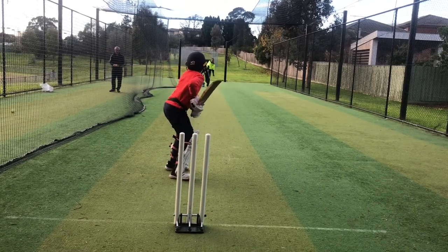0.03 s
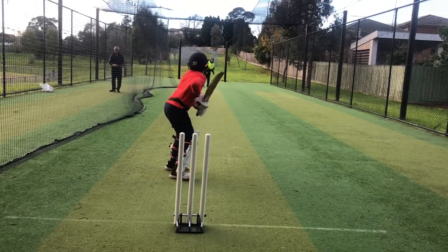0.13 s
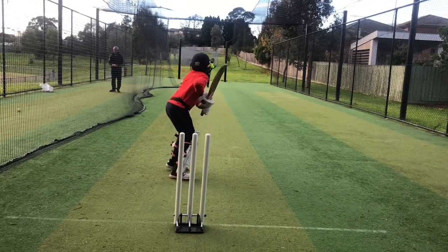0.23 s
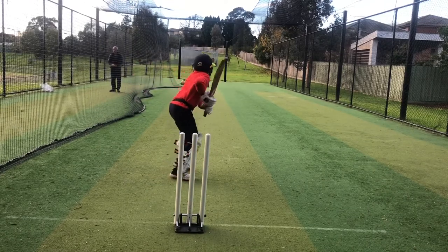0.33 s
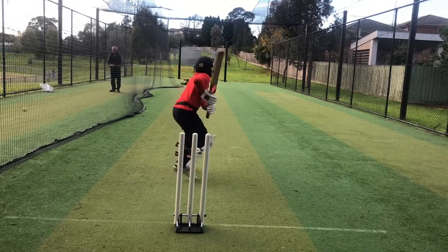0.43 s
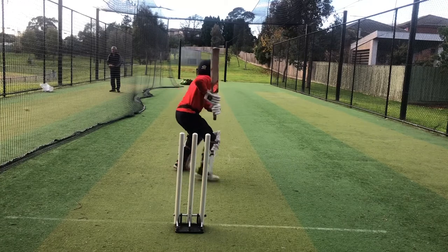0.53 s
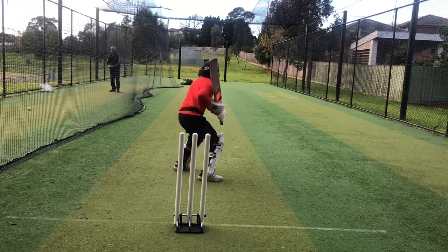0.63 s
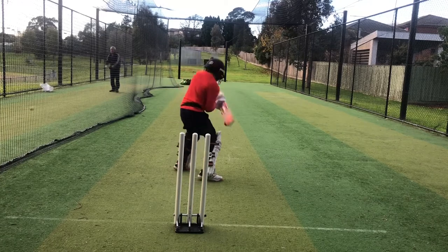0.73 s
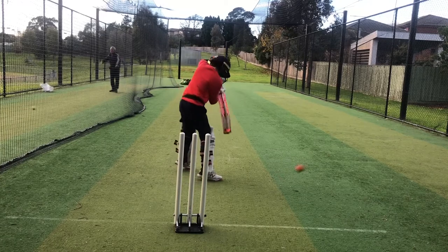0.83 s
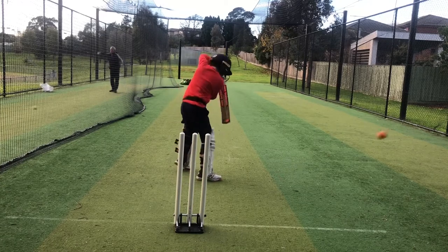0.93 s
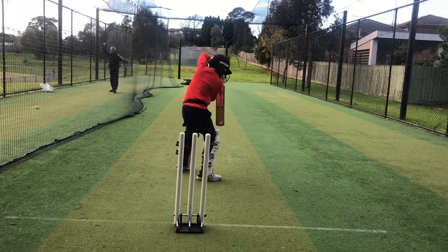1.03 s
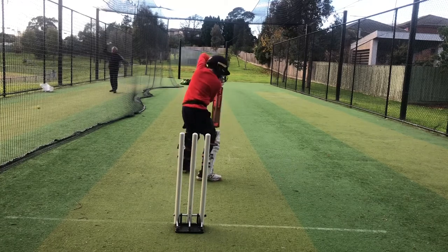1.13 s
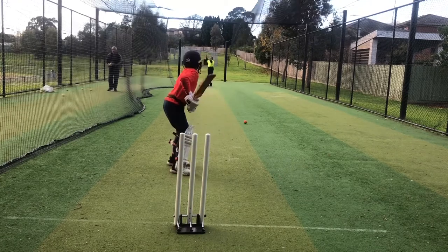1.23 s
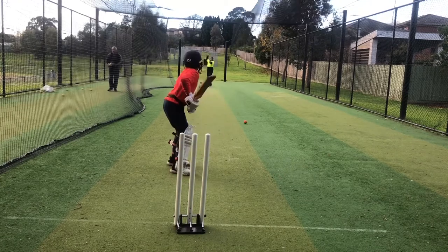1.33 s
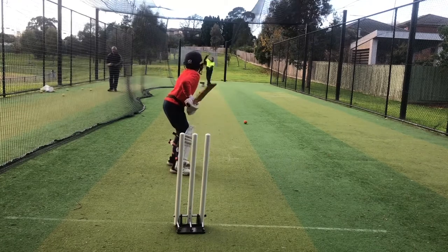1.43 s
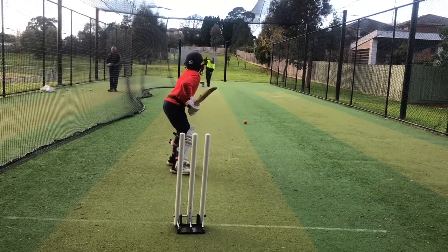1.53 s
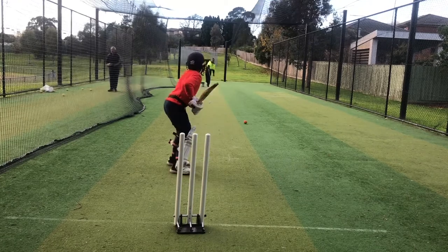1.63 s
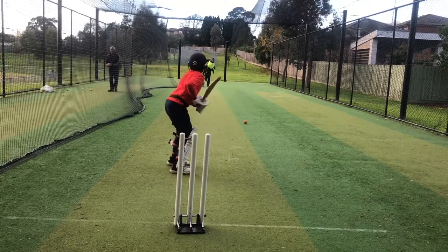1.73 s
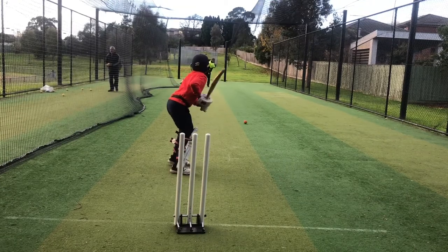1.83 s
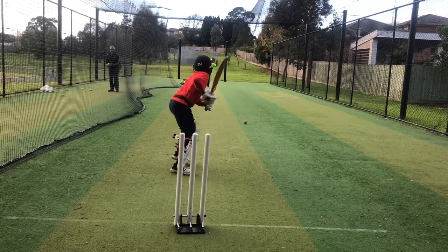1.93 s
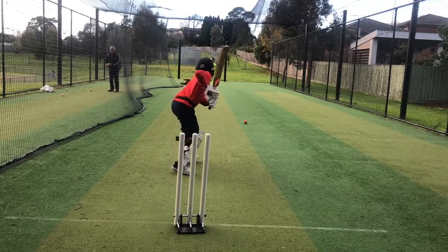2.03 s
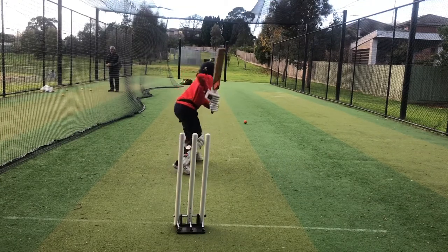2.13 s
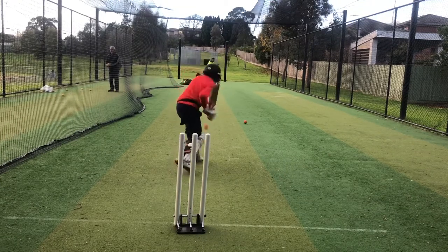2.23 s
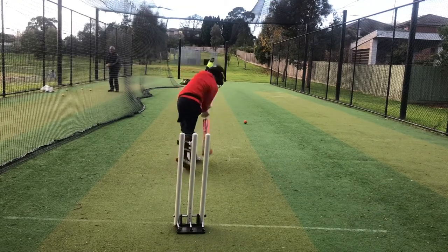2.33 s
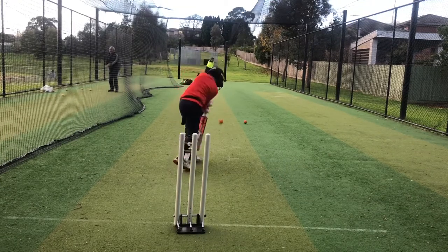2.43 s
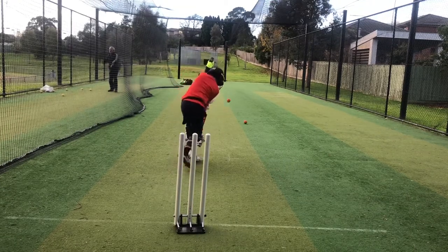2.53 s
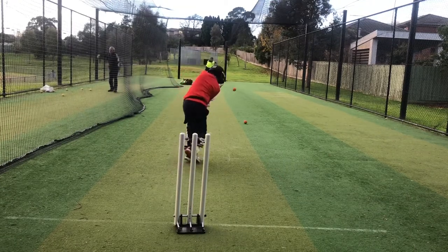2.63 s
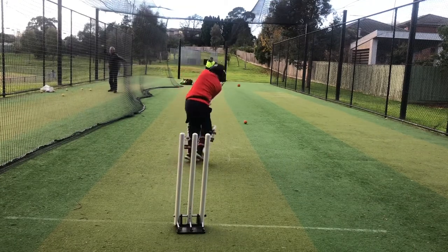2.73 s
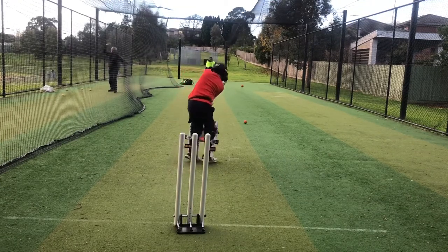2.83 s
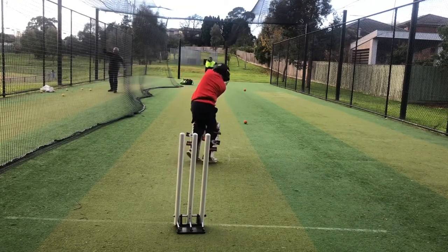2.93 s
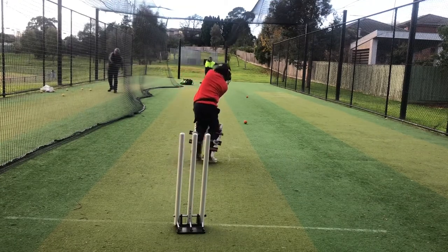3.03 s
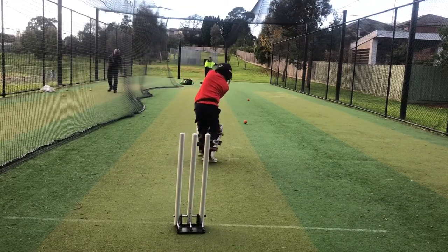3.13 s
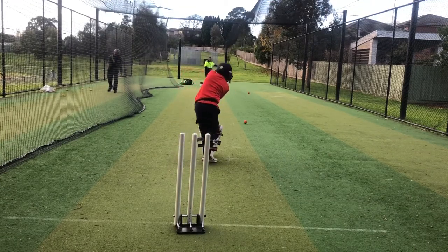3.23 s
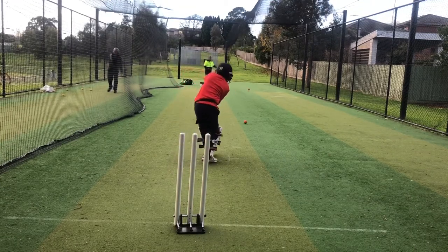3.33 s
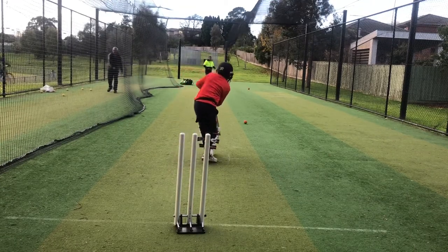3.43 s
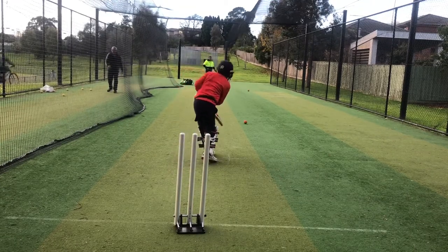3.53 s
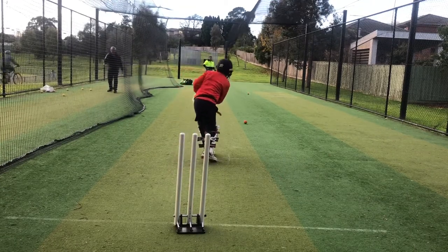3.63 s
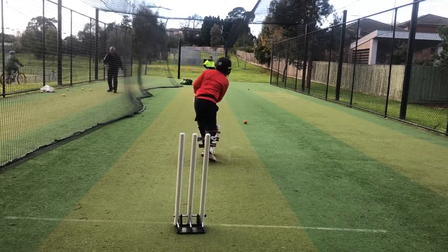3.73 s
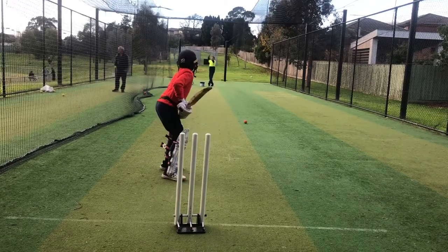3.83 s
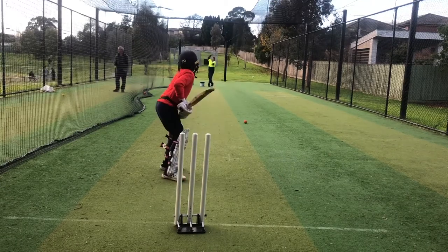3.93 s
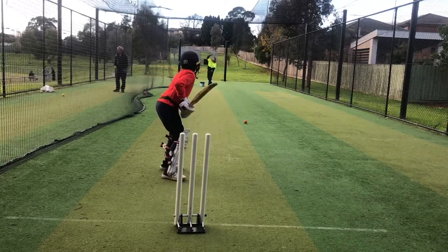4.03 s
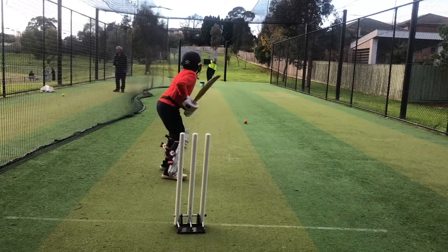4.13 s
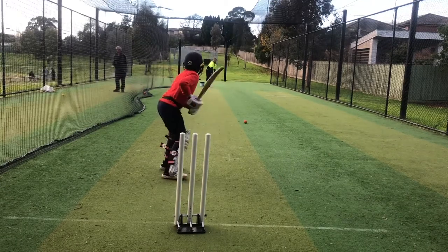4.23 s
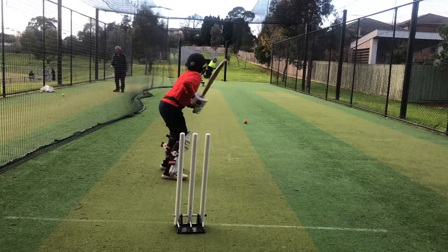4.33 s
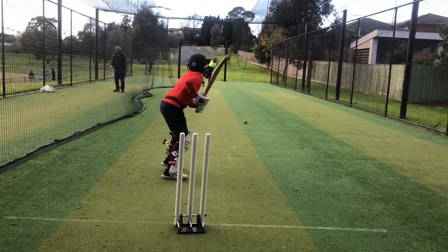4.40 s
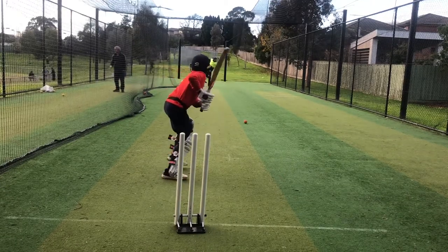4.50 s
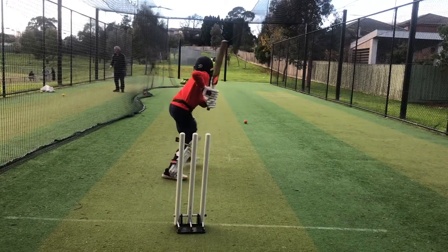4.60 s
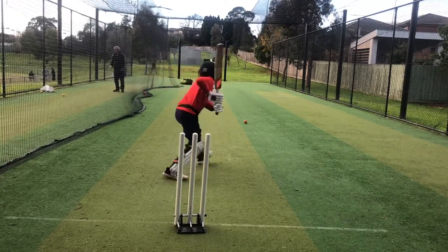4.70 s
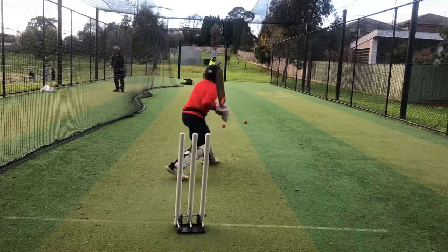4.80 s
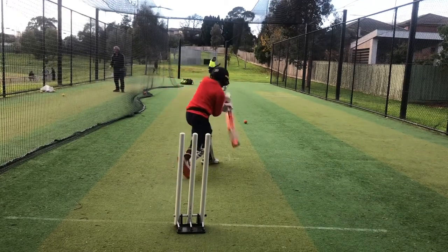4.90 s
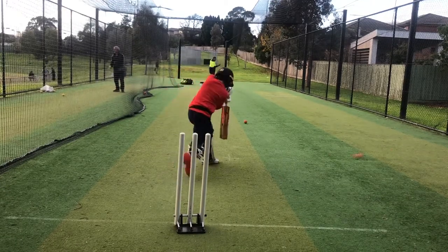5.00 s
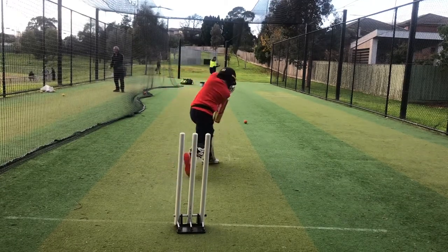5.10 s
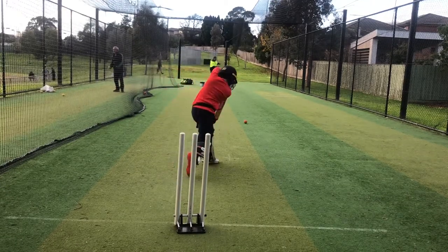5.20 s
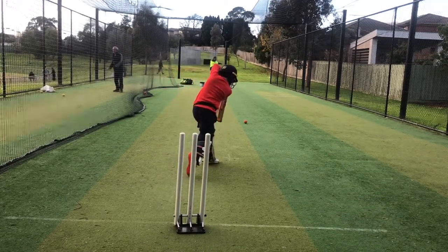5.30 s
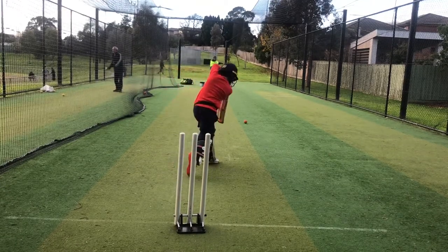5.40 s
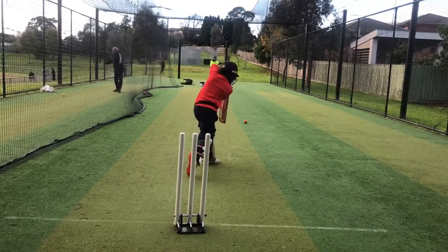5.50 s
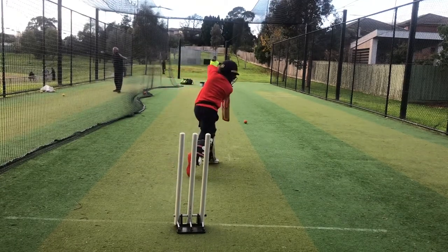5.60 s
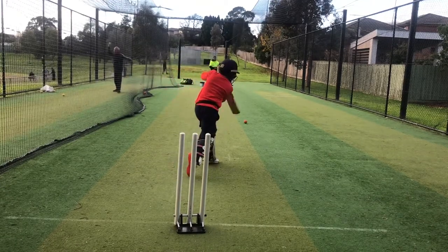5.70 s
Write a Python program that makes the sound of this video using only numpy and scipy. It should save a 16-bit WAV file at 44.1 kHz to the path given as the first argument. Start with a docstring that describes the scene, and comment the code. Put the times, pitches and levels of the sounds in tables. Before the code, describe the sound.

A cricket batter hits three deliveries with sharp loud cracks; the ball knocks on thin turf, shoes scuff, and one deep panel thump follows the last.

```python
"""An outdoor batting net between two fences: three deliveries joined by short fades.
The bat cracks on the ball; the ball bounces on thin turf over concrete and thumps a panel near the microphone.
Each knock is a noise crack plus ringing modes, returned by the fences and a scattered tail.
Shaped noise makes shoes and pads scuff and swish, wind buffet the microphone and far traffic hum;
a soft push on ringing ground modes makes the front foot plant."""
import sys
import numpy as np
from scipy import signal
from scipy.fft import rfft, irfft, next_fast_len
from scipy.io import wavfile

SR = 44100
rng = np.random.default_rng(int(sys.argv[2]) if len(sys.argv) > 2 else 0)


def wav_record(signal):
    """Record a signal, one row per channel, as 16-bit PCM in the file named by sys.argv[1]."""
    frames = np.transpose(np.atleast_2d(signal))
    bounded = np.clip(frames, -1, 1)
    # unit amplitude maps onto the largest positive 16-bit level
    quanta = np.round(bounded * 32767).astype(np.int16)
    wavfile.write(sys.argv[1], SR, quanta)


N = 253876
TIME = np.arange(N) / SR

# Joins between deliveries: at_s, fade_out_s, fade_in_s
JOINS = [(1.25, 0.053, 0.048), (3.784, 0.041, .03)]


def from_db(db):
    """Decibels to gain."""
    return 10 ** (np.asarray(db) / 20)


def rms_one(x):
    """Scale to rms 1."""
    return x / np.sqrt(np.mean(x ** 2) + 1e-20)


def at_hz(hz, points, column=1):
    """Read a table column on a log-frequency axis."""
    points = np.array(points)
    return np.interp(np.log(hz + 1), np.log(points[:, 0]), points[:, column])


def coloured(spectrum):
    """Steady noise of the given spectrum, rms 1."""
    size = next_fast_len(N)
    hz = np.arange(size // 2 + 1) * SR / size
    white = rfft(rng.standard_normal(size))
    return rms_one(irfft(white * from_db(at_hz(hz, spectrum)), size)[:N])


def drift(rate_hz):
    """Slow random wander of rms 1: white noise through two equal one-pole lowpasses."""
    r = np.exp(-2 * np.pi * rate_hz / SR)
    wander = signal.lfilter([1], [1, -2 * r, r * r], rng.standard_normal(N + SR))
    return rms_one(wander[SR:])     # the first second lets the filter settle


def band_noise(noise, edges_hz):
    """Keep one band of a noise."""
    return signal.sosfilt(signal.butter(2, edges_hz, "band", fs=SR, output="sos"), noise)


def ring(force, hz, t60_s):
    """One decaying mode: a two-pole resonator driven by a force."""
    r, w = from_db(-60 / (t60_s * SR)), 2 * np.pi * hz / SR
    return signal.lfilter([0, np.sin(w)], [1, -2 * r * np.cos(w), r * r], force + 1e-18)


def add(out, at_s, sound):
    """Mix a sound in at a time."""
    i = int(round(at_s * SR))
    part = sound[:max(len(out) - i, 0)]
    out[i:i + len(part)] += part


def air():
    """Far traffic, wavering a little, and a faint patchy rustle of leaves and netting."""
    # Traffic spectrum, scaled to rms 1: freq_hz, relative_db_per_hz
    traffic_spectrum = [(15, -64), (25, -19), (70, -2.5), (108, -6), (146, -9), (226, -15), (457, -20),
                        (584, -20.5), (1150, -22), (2400, -32), (3910, -33), (15200, -52.5), (16500, -61)]
    traffic_db = -51.5 + 1.1 * drift(0.69)
    traffic = from_db(traffic_db) * coloured(traffic_spectrum)
    treble = signal.butter(2, 3500, "high", fs=SR, output="sos")
    rustle = signal.sosfilt(treble, rng.standard_normal(N))
    return traffic + from_db(-79.5 + 4.0 * drift(7)) * rustle


def scuffs():
    """Gritty friction noise in a broad band, swelling and fading; a tick is a very short wide one."""
    # Shoes and pads drag over the turf: start_s, length_s, level_db, centre_hz
    drags = [(0.008, .11, -53, 5100), (0.308, .09, -57, 4650), (0.369, .026, -44, 4167),
             (0.393, .079, -57.5, 4700), (0.538, .072, -47.5, 5560), (0.606, .041, -56, 5570),
             (1.09, .045, -57.5, 8000), (1.619, .11, -56.5, 3300), (1.98, .09, -63, 9000),
             (2.108, .075, -57.5, 5560), (2.245, .057, -45, 4800), (2.294, .04, -40.5, 4660),
             (2.807, .05, -47.5, 5100), (2.976, .054, -50.5, 3500), (3.239, .062, -51, 6020),
             (4.058, .068, -51.5, 5600), (4.135, .15, -57.5, 4280), (4.712, .046, -47, 7350),
             (4.882, .07, -37.5, 6500)]
    # Small ticks of studs and buckles: start_s, level_db
    stud_ticks = [(0.587, -36.5), (2.264, -38), (2.838, -36), (3.008, -47.5)]
    # each row gains its rise (share of the length) and bandwidth (octaves)
    rows = [(*row, .33, 1.85) for row in drags]
    rows += [(s, .008, db, 6200, .4, 3.1) for s, db in stud_ticks]

    grit = rng.standard_normal(N) * from_db(2.4 * drift(250))
    out = np.zeros(N)
    for s, length_s, db, centre_hz, rise, octaves in rows:
        rise_s, fall_s = rise * length_s, (1 - rise) * length_s
        i = int(s * SR)
        t = np.arange(int(3 * length_s * SR)) / SR     # room for the fade to die away
        half_width = 2 ** (octaves / 2)
        edges_hz = np.clip([centre_hz / half_width, centre_hz * half_width], 100, .45 * SR)
        band = band_noise(grit[i:i + len(t)], edges_hz)
        swell = np.sin(np.pi / 2 * t / rise_s) ** 2
        fade = np.exp(-(abs(t - rise_s) / fall_s) ** 2.5)
        shape = np.where(t < rise_s, swell, fade)
        add(out, s, from_db(db) * rms_one(band) * shape[:len(band)])
    return out


def swishes():
    """Narrow noise riding on a gliding centre."""
    # Short swishes: start_s, length_s, from_hz, to_hz, level_db
    glides = [(0.035, 0.027, 3340, 4630, -50), (0.07, 0.029, 3780, 3500, -54),
              (0.38, 0.011, 2790, 4760, -42), (0.908, 0.024, 4200, 3900, -48),
              (2.459, 0.031, 5180, 3780, -44.5), (2.969, .04, 1990, 2184, -51),
              (4.078, 0.045, 3400, 4830, -49), (4.138, 0.12, 713, 2300, -55.5),
              (4.18, 0.047, 5600, 6700, -58), (4.885, 0.011, 5220, 8600, -39),
              (5.393, 0.065, 5260, 6730, -64)]
    width_hz = 800
    lowpass = signal.butter(2, width_hz / 2, fs=SR, output="sos")
    out = np.zeros(N)
    for s, length_s, from_hz, to_hz, db in glides:
        size = int(length_s * SR)
        u = np.arange(size) / size
        slow_pair = signal.sosfilt(lowpass, rng.standard_normal((2, SR // 4)))[:, -size:]
        phase = 2 * np.pi * np.cumsum(from_hz * (to_hz / from_hz) ** u) / SR
        # two lowpassed noises on cosine and sine carriers make one band around the glide
        band = slow_pair[0] * np.cos(phase) + slow_pair[1] * np.sin(phase)
        add(out, s, from_db(db) * np.sin(np.pi * u) * rms_one(band))
    return out


def smear(x, lags):
    """All-pass chain: spreads a sound in time, keeps its colour."""
    for lag in lags:
        taps = np.zeros(lag + 1)
        taps[0], taps[-1] = -.45, 1
        x = signal.lfilter(taps, taps[::-1], x)
    return x


def struck_body(ring_db, modes, contact_s, crack_s, lag_cycles, dull_db):
    """A brief contact push rings each mode, low ones later; also gives a faster-dying version."""
    t = np.arange(SR // 3) / SR
    strengths_db = rng.normal(0, 1, len(modes))
    body, blur = 0, 0
    for k, (hz, db, t60_s) in enumerate(modes):
        u = (t - crack_s - lag_cycles / hz).clip(0) / contact_s
        level = from_db(ring_db + db + strengths_db[k] - dull_db * np.log2(hz / 500))
        push = (-1) ** k * level * u * np.exp(-u) / (contact_s * SR)
        body = body + ring(push, hz, t60_s)
        blur = blur + 2 * ring(push, hz, t60_s / 4.5)
    return body, blur


def fence_arrivals(s, near_s, near_db, far_s, far_db):
    """The direct sound, then near, far and combined echoes and a flutter between the fences."""
    flutter_s, flutter_db = .0318, -6.5     # time and level change of each round trip
    arrivals = [(s, 0), (s + near_s, near_db), (s + far_s, far_db)]
    arrivals.append((s + far_s + near_s, far_db + near_db - 13.5))
    arrivals += [(s + far_s + k * flutter_s, far_db + k * flutter_db) for k in range(1, 5)]
    return arrivals


def knock(row, hiss, modes, contact_s, crack_s, lag_cycles, dull_db, scatter_db):
    """A noise crack, then ringing modes, returned smeared and duller; also a pulse to feed the yard."""
    s, crack_db, above_db, *echoes = row
    body, blur = struck_body(crack_db + above_db, modes, contact_s, crack_s, lag_cycles, dull_db)
    t = np.arange(SR // 3) / SR
    out, feed = np.zeros(N), np.zeros(N)
    for order, (at_s, db) in enumerate(fence_arrivals(s, *echoes)):
        u = t / (crack_s * (1 + .3 * order))     # each later arrival has a longer crack
        burst = u ** 2 * np.exp(1.5 - 1.765 * u ** 0.92)
        start = rng.integers(0, N - len(t))
        crack = from_db(crack_db - 1.5 * order) * burst * hiss[start:start + len(t)] / 2
        if order:     # every return loses treble, later ones more
            cut_hz = min(11000 / order, .45 * SR)
            crack = signal.lfilter(*signal.butter(1, cut_hz, fs=SR), crack)
        lags = rng.integers(25, 90, min(order, 2))     # posts and slats return copies just behind
        early_s = .3 * order * crack_s     # a smeared echo swells in ahead of its peak
        add(out, at_s - early_s, from_db(db) * crack)
        add(out, at_s, from_db(db) * smear(body, lags))
    blur[:2] += from_db(crack_db + 23.5) * np.array([1, -.6])     # a bright click joins the pulse
    add(feed, s, from_db(scatter_db) * blur)
    return out, feed


def yard(x):
    """Scattered return from trees, fences and houses: lumpy noise, swelling briefly, dying band by band."""
    # Scattered tail: freq_hz, level_db, t60_s
    tail = [(100, -23, .5), (257, 6.5, 0.7), (600, -13, .9), (1200, -2, 0.72), (2520, -16.5, 0.83),
            (5000, -9.5, .55), (8500, -14.5, 0.39), (14000, -28.5, .3)]
    t = np.arange(SR) / SR
    edges_hz = 60 * 2 ** np.arange(0, 8.4, .5)
    white = rng.standard_normal((2, SR)) * from_db(2.4 * drift(45)[:SR])
    response = 0
    for k, (low, high) in enumerate(zip(edges_hz, edges_hz[1:])):
        band = band_noise(white[k % 2], [low, high])
        hz = np.sqrt(low * high)
        t60_s = at_hz(hz, tail, column=2).clip(.05)
        response = response + band * from_db(at_hz(hz, tail) - 60 * t / t60_s)
    response = response * (1 - np.exp(-t / 0.0015)) / np.sqrt(SR / 20)
    return signal.fftconvolve(x, response)[:N]


def knocks():
    """Bat, turf and panel impacts with their returns; a join ends whatever still rings."""
    # Impacts: at_s, crack_db, ring_above_crack_db, near_echo_s, near_echo_db, far_echo_s, far_echo_db
    bat_blows = [(0.7802, -2.5, -2.5, .0203, -4, .0465, -6), (2.332, -1.5, -1.5, .0203, -3.5, .0505, -10),
                 (4.9123, -3.5, .5, .019, -2.5, .050, -7.5)]
    turf_bounces = [(0.5159, -24.5, -1, .015, -1, .045, -16), (2.2157, -36, 0, .017, -16, .047, -16),
                    (2.2723, -17, -6, .018, -6, .048, -10), (3.139, -34, -3, .016, -27, .046, -25),
                    (3.6694, -20, -2, .009, -6, .028, -19), (3.729, -15, -1.5, .020, -14, .030, -24),
                    (3.7363, -11, -1.5, .022, -17, .031, -11), (4.7614, -19, -6, .015, -5, .046, -28),
                    (5.529, -24, -30, .028, -17, .058, -34)]
    panel_thumps = [(5.2232, -9.5, 5.8, .028, -11, .059, -17)]
    # Ringing modes of each struck thing: freq_hz, level_db, t60_s
    bat_modes = [(200, -11.5, 0.036), (370, -7.5, 0.01), (527, -6, 0.013), (766, -1, 0.026),
                 (996, -9, 0.016), (1330, -7.5, 0.013), (1606, -2.5, 0.014), (2384, -13.5, 0.035),
                 (3940, -24, .015)]
    turf_modes = [(146, -11, 0.066), (259.5, -2, 0.02), (510, 2, 0.014), (875, -9, .02), (1270, -33, .02)]
    panel_modes = [(80.7, -10, 0.22), (149, -1, 0.093), (233, 1.5, 0.054), (310, 1, 0.033),
                   (463, -2, 0.026), (765, -8, 0.026), (1110, -13, 0.035)]
    # Manner of impact: contact_s and crack_s (time scales), lag_cycles, dullness_db_per_octave, scatter_db
    bat_way = (.00007, .0013, .6, .8, 2)
    turf_way = (.0002, .0015, .3, .2, -1)
    panel_way = (.0002, .0016, .4, .5, -10)
    # Shared crack spectrum before tilt: freq_hz, relative_db_per_hz
    crack_spectrum = [(880, -15.5), (1500, -16), (2260, -14.5), (4300, -15.5), (8680, -16.5),
                      (10400, -19.5), (15100, -24), (16500, -37.5)]
    # Crack brightness about 4 kHz: bat, turf, panel (each db_per_octave)
    crack_tilts = (-.1, 2, -.8)

    hisses = []
    for tilt in crack_tilts:
        hisses.append(coloured([(hz, db + tilt * np.log2(hz / 4000)) for hz, db in crack_spectrum]))
    kinds = [(bat_blows, hisses[0], bat_modes, bat_way),
             (turf_bounces, hisses[1], turf_modes, turf_way),
             (panel_thumps, hisses[2], panel_modes, panel_way)]

    out = np.zeros(N)
    bounds = [0] + [s for s, *_ in JOINS] + [N / SR]
    for start, end in zip(bounds, bounds[1:]):
        direct, feed = np.zeros(N), np.zeros(N)
        for rows, hiss, modes, way in kinds:
            for row in rows:
                if start < row[0] < end:
                    sound, pulse = knock(row, hiss, modes, *way)
                    direct += sound
                    feed += pulse
        out += (direct + yard(feed)) * (TIME < end)
    return out


def footfalls():
    """The front foot plants: a soft slow push sets the slab thudding."""
    # Foot plants: at_s, level_db
    plants = [(2.227, -14.5), (4.804, -9)]
    # Slab modes: freq_hz, level_db, t60_s
    slab_modes = [(104.6, -4, .09), (165, -13, 0.053)]
    t = np.arange(SR // 4) / SR
    push = t / .0015 * np.exp(-t / .0015)
    push = push / push.sum()
    out = np.zeros(N)
    for s, db in plants:
        for hz, mode_db, t60_s in slab_modes:
            add(out, s, from_db(db + mode_db) * ring(push, hz, t60_s))
    return out


def wind():
    """Lumpy low turbulence on the microphone; stronger gusts reach higher."""
    # Groups of gusts, each a level curve: at_s, level_db
    gust_groups = [
        [(3.79, -51), (3.866, -37), (3.894, -39), (3.924, -32), (3.968, -40), (3.998, -37), (4.046, -40),
         (4.082, -66), (4.09, -57)],
        [(4.1, -51), (4.34, -42), (4.372, -52), (4.404, -43), (4.444, -55), (4.532, -43), (4.608, -61),
         (4.706, -43), (4.73, -46), (4.8, -31)],
        [(5.34, -34), (5.372, -39), (5.454, -46), (5.486, -36), (5.522, -31), (5.55, -37), (5.598, -28),
         (5.63, -33), (5.694, -33), (5.757, -45)],
    ]
    calm_db, step_db = -51, 7.5     # one layer higher for each step over calm
    gusty = rng.standard_normal(N) * from_db(2.1 * drift(28))
    rumble_cut = signal.butter(2, 70, "high", fs=SR, output="sos")
    layers = []
    for top_hz in [132, 202, 290, 460]:
        top_cut = signal.butter(5, top_hz, fs=SR, output="sos")
        layers.append(rms_one(signal.sosfilt(np.vstack([top_cut, rumble_cut]), gusty)))

    out = np.zeros(N)
    for rows in gust_groups:
        s, db = np.transpose(rows)
        level_db = np.interp(TIME, s, db)
        place = ((level_db - calm_db) / step_db).clip(0, len(layers) - 1)
        blend = sum((1 - abs(place - k)).clip(0) * layer for k, layer in enumerate(layers))
        edges = np.minimum(TIME - s[0], s[-1] - TIME).clip(0, .01) / .01     # 10 ms fades
        out += from_db(level_db) * edges * blend
    return out


def scene():
    """Everything at one microphone."""
    return (air() + scuffs() + swishes() + knocks() + footfalls() + wind())[None]


def record(dry):
    """The microphone drops the deep bass; the level dips at the joins, peaks are rounded, the top is cut."""
    bass_cut = signal.butter(2, 56.5, "high", fs=SR, output="sos")
    heard = signal.sosfilt(bass_cut, dry)
    fades = np.ones(N)
    for s, out_s, in_s in JOINS:
        fades *= np.maximum((s - TIME) / out_s, (TIME - s) / in_s).clip(.03, 1)
    rounded = 1.2 * np.tanh(heard * fades / 1.2)
    top_cut = signal.cheby2(20, 70, 16800, fs=SR, output="sos")
    return signal.sosfilt(top_cut, rounded)


dry = scene()
out = record(dry)
wav_record(out)
```